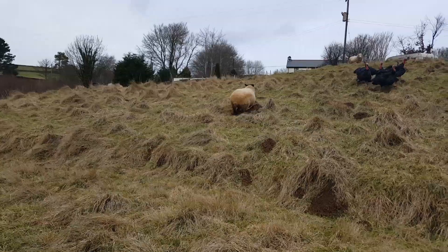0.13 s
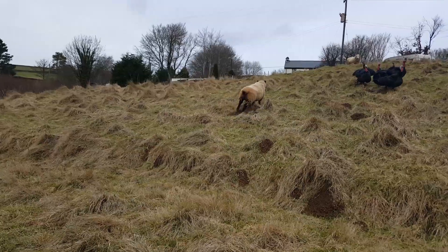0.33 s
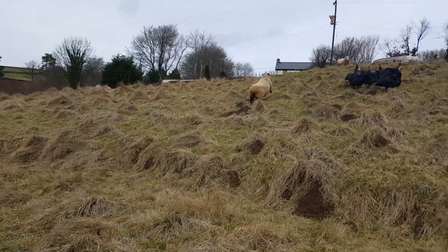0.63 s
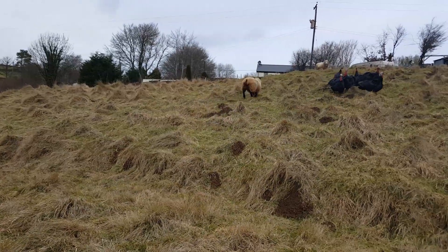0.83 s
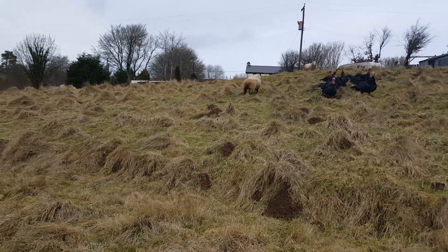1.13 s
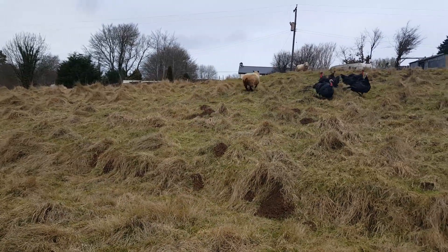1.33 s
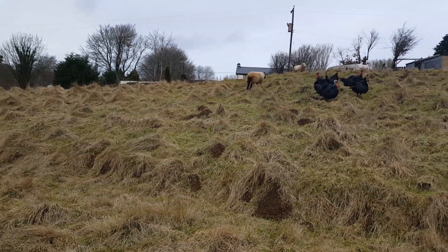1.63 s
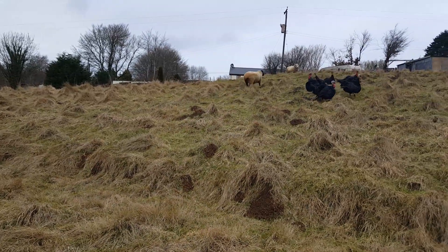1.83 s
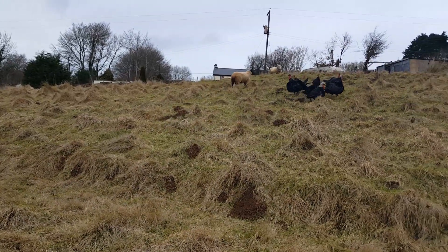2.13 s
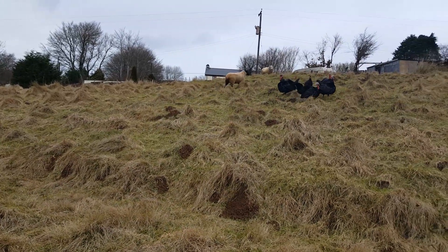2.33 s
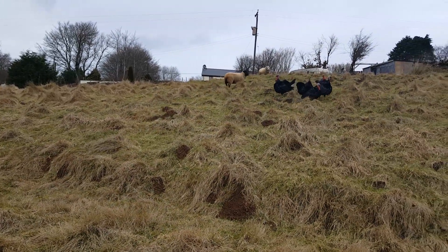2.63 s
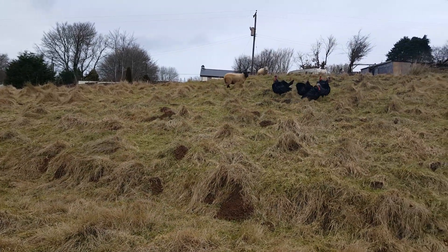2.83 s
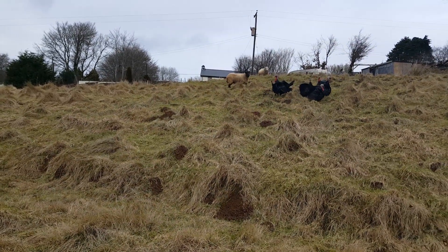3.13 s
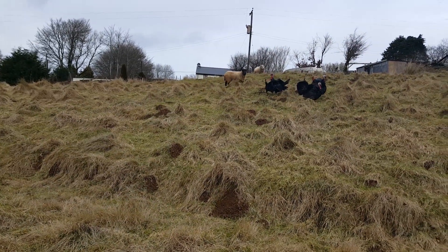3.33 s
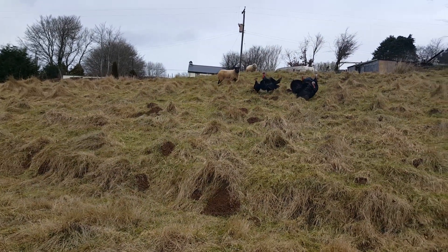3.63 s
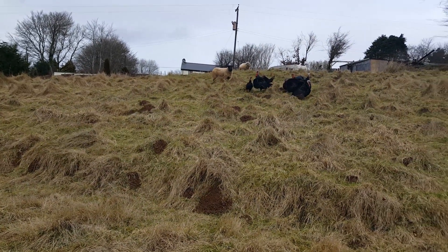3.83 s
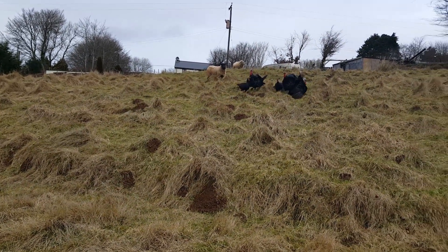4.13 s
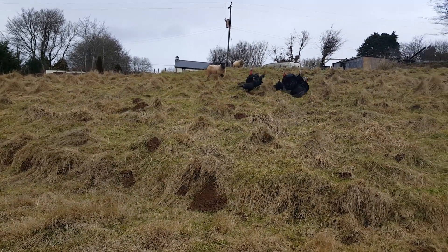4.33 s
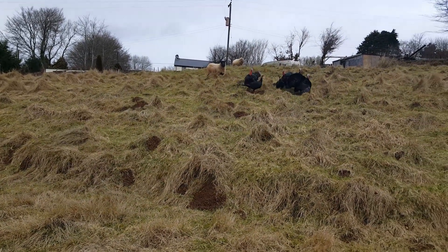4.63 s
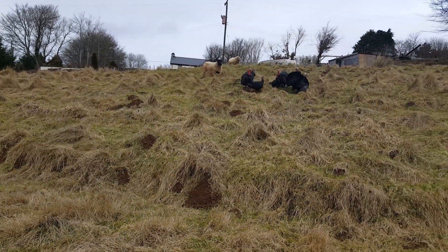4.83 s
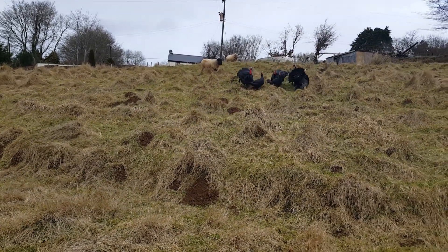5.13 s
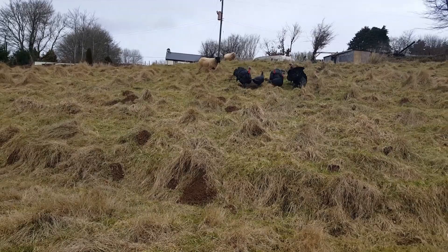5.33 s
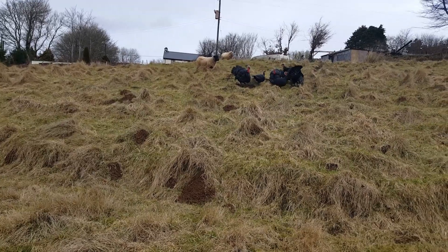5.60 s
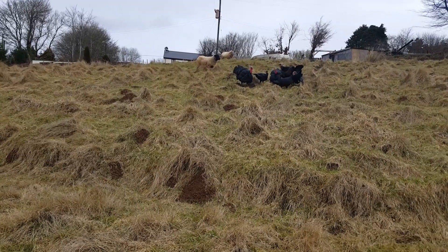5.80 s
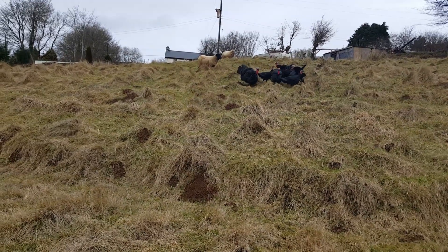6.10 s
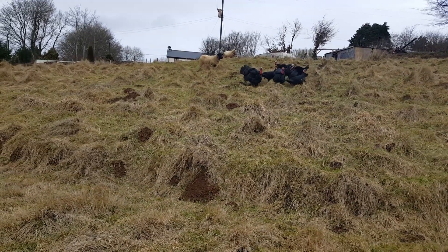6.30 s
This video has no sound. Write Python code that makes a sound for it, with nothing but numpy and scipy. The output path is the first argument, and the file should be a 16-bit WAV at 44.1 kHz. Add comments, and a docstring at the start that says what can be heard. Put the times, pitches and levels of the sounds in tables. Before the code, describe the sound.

Turkeys call outdoors on a grassy slope, with little echo: reedy, rapid, wavering bursts separated by pauses, the longest near four seconds and a last short one at the end. Soft breeze in dry grass and a faraway rumble lie underneath. Close to the microphone, a finger lifts off with a pop early on, then rubs the case in bright gritty strokes with clicks and low knocks.

```python
"""After a third of a second of near silence, sound fades in with a soft pop and scuff on the right as a finger
leaves that microphone port. Then turkeys gobble in five bursts on a grassy hillside: thin whines, loud yelps,
and syllables that slide up, break and fall back, all built from gliding, wavering harmonics.
Filtered noise makes the dry grass, a finger rubbing the camera's case and a low distant rumble.
Damped low tones make dull bumps; short bursts of noise make ticks on the case."""
import sys
import numpy as np
from scipy import signal
from scipy.fft import rfft, irfft, next_fast_len
from scipy.io import wavfile
from scipy.ndimage import uniform_filter1d, map_coordinates

SR = 44100
rng = np.random.default_rng(int(sys.argv[2]) if len(sys.argv) > 2 else 0)


def dump(signal):
    """Clip the signal to [-1, 1] and save it as 16-bit WAV at the path in sys.argv[1]."""
    limited = np.clip(np.atleast_2d(signal).T, -1, 1)
    pcm = np.round(limited * 32767).astype(np.int16)
    wavfile.write(sys.argv[1], SR, pcm)


N = 284886

# Bird levels below come before a small shared lift (in scene) and the hillside.
# Gobble syllables; overshoot, squeal and fall are left out at length 0, very short parts are stretched:
# start_s, slide_s, overshoot_s, squeal_s, fall_s, slide_level_db, rest_level_db
SYLLABLES = [(.762, 0.023, 0.0067, 0, 0, -48, -56), (.933, 0.046, 0.0034, 0.016, 0, -53, -54),
             (1.474, .045, 0, 0.0013, 0, -40, -42), (2.711, 0.041, 0, .031, 0.062, -41.5, -48),
             (2.879, .043, 0, 0.043, 0.043, -38.5, -46.5), (3.947, 0.04, 0.022, 0.01, .078, -40.5, -49.5),
             (4.129, .04, 0.0015, 0.037, 0.043, -39.5, -46.5), (4.285, .038, 0, 0.073, 0, -39.5, -51.5),
             (5.906, .034, 0, 0.036, .074, -44.5, -49.5), (6.096, .029, 0.031, 0.015, 0.052, -38.5, -49),
             (6.271, 0.029, 0.025, .045, 0.019, -43, -47)]
# How pitch and loudness move within each part of a syllable: share_of_length, pitch_hz, level_db
SLIDE = [(0, 640, -11.5), (.25, 670, -4), (.47, 713, 0.5), (.62, 920, -0.5), (.8, 1030, -2), (1, 1076, -13)]
OVERSHOOT = [(0, 1560, -4), (.35, 1550, 4), (.45, 1920, -4.5), (1, 1730, -4)]
SQUEAL = [(0, 1498, -5), (.45, 1402, -2), (1, 1340, -10.5)]
FALL = [(0, 1067, -9), (.25, 1041, 1.5), (.72, 938, 1.5), (.9, 790, 2), (1, 650, -13)]
# Strength of the slide's harmonics 2 to 5: level_db
SLIDE_OVERTONES = [-8.5, -10.5, -20, -27]
FALL_OCTAVE_DB, SQUEAL_OCTAVE_DB = -9, -14.5
# The short croak where a falling note bottoms out: share_of_length, pitch_hz, level_db
CROAK = [(0, 630, -9), (.4, 564, 3), (1, 510, -7.5)]
# Strength of the croak's harmonics 2 and 3: level_db
CROAK_OVERTONES = [1, 2.5]
CROAK_S, CROAK_DB = .02, -11  # length, level against the note
# A croak on its own: start_s, length_s, level_db
LONE_CROAK = (3.032, 0.046, -55)
# Held notes, some drooping at the end:
# start_s, length_s, droop_s, start_hz, end_hz, level_db, onset_db (against the level), octave_db
WHINES = [(0.582, 0.058, 0, 882, 890, -45.5, -4, -22), (.838, 0.052, 0.012, 975, 934, -46, 5, -10),
          (1.374, 0.1, 0.025, 1027, 920, -41, -14.5, -18), (2.495, .15, 0.02, 1000, 881, -49, -6, -14),
          (3.592, 0.1, 0, 865, 980, -49.5, -4.5, -30), (3.729, .156, 0.023, 925, 890, -50, 0, -13.5),
          (3.75, 0.038, 0, 890, 1067, -45, 2, -19), (4.322, .113, 0, 930, 944, -43, -7, -8.5),
          (5.698, .1, 0.024, 950, 805, -54.5, -5, -9)]
# Loud notes that dip and flick up:
# start_s, hold_s, sink_s, start_hz, dip_hz, end_hz, level_db, octave_db
YELPS = [(.695, 0.0072, 0.012, 954, 833, 1000, -46.5, -18), (1.009, .012, 0.018, 1002, 929, 1140, -34, -21),
         (1.542, 0.02, .025, 1046, 838, 1060, -34, -12.5),
         (1.625, 0.0061, 0.021, 1070, 831, 1070, -34.5, -11.5),
         (1.688, 0.0052, .014, 1054, 823, 1100, -35.5, -12.5),
         (3.843, .005, .013, 948, 720, 1150, -37.5, -18), (4.473, .029, 0.011, 1015, 858, 1010, -35.5, -9),
         (4.553, .005, .018, 1010, 813.5, 1076, -36, -9)]
# Small glides between and over the calls: start_s, length_s, start_hz, end_hz, level_db
CHIRPS = [(.815, 0.026, 655, 770, -46.5), (1.05, 0.0088, 1420, 1680, -39.5),
          (1.07, 0.018, 1390, 695, -44.5), (1.738, .013, 1010, 836, -53), (2.43, 0.031, 787, 1160, -52.5),
          (4.368, .04, 690, 820, -45), (4.579, 0.0078, 1780, 2030, -38)]
# Tone colour of the birds' throat and beak: pitch_hz, gain_db
THROAT = [(550, -5), (700, -2), (1050, -1.5), (1250, -2.5), (1420, 4), (1600, -3), (1900, 2), (2300, -9.5),
          (2750, 3.5), (3300, -35)]

# The noise colours below are shapes only; each is scaled to a common loudness before use.
# A finger rubbing the case, at each port: pitch_hz, level_db (per Hz)
RUB_LEFT = [(300, -12.5), (1500, -5.5), (3200, -7.5), (4500, -8.5), (6000, -12), (8500, -13), (10000, -9),
            (12500, -11.5), (15500, -16)]
RUB_RIGHT = [(300, -12.5), (1500, -4.5), (3200, -7.5), (4500, -1.5), (6000, 1), (7400, 2.5), (8500, -7.5),
             (10000, -18.5), (12500, -10), (15500, -19)]
# The finger's strokes: start_s, length_s, level_db, treble_db (added to the level for the bright part)
STROKES = [(1.423, .08, -50.5, -5.5), (2.861, 0.41, -48, 1), (3.283, 0.41, -48.5, 1),
           (3.704, 0.084, -43, .5), (3.808, 0.062, -41, -0.5), (3.881, 0.13, -46.5, 0.5),
           (4.044, .24, -47.5, -1), (4.294, 0.12, -43, -3), (4.436, .23, -44.5, 0),
           (4.68, .26, -52.5, -0.5), (4.915, .04, -49.5, 0.5), (4.96, .055, -56.5, -2)]
# Ticks on the case, before the rubbing colours: time_s, level_db, lean_right_db
TICKS = [(.482, -39, 16), (3.3985, -27.5, 6), (3.4258, -23, 5), (3.6135, -37, 1), (3.844, -34, 3),
         (3.8635, -35, 3), (3.9385, -30.5, 4), (4.0145, -33, 4), (4.1435, -37, 4), (4.954, -38, 0),
         (6.1045, -45, 14)]
# Dull bumps of feet and hands:
# time_s, level_db, pitch_hz, rise_hz_per_s, time_to_fall_60_db_s, attack_s, crunch_db (against the knock)
BUMPS = [(1.414, -26.5, 199, 0, 0.076, 0.0061, -23), (1.456, -31, 243, 0, .065, .001, -8),
         (1.458, -31, 378, 7000, .09, 0.0064, -8), (3.679, -34.5, 217, 0, .12, 0.0027, -30),
         (3.938, -38, 407, 0, .019, .0003, 4), (4.014, -37.5, 246, 0, 0.031, 0.00032, -4),
         (4.358, -26.5, 230, 0, 0.057, .001, -10), (4.373, -41, 425, 0, 0.14, 0.0023, 1),
         (6.21, -31.5, 218, 0, 0.036, .0003, -10.5)]
# Air and dry grass as each port hears them: pitch_hz, level_db (per Hz)
AIR_LEFT = [(200, -11), (900, 1.5), (2000, -0.5), (3200, -3), (4500, -8), (6000, -11), (8500, -12),
            (10000, -9.5), (12500, -11), (15500, -16.5)]
AIR_RIGHT = [(200, -3), (900, 1.5), (2000, -1.5), (3200, -1.5), (4500, -4.5), (6200, -5.5), (7300, -9.5),
             (8500, -18), (10000, -27), (12500, -21.5), (15500, -25)]
# Air moving in the grass: time_s, level_db
BREEZE = [(1.3, -50.5), (2.2, -54), (3.2, -53), (4.6, -50), (5.2, -55.5), (6.4, -52)]
# Grass swishes: middle_s, half_length_s, level_db (before the extra brightness)
SWISHES = [(0.583, 0.097, -53.5), (1.038, 0.11, -49.5), (1.444, 0.071, -47), (1.51, 0.026, -46.5),
           (4.34, 0.046, -50), (6.346, 0.052, -58)]
# The hand shading the right port's treble: time_s, gain_db
SHADE = [(.6, -3), (.75, -15), (1.05, -6.5), (1.5, -3), (1.85, -10), (2.3, 1), (6.4, -1)]
# The distant rumble: pitch_hz, level_db (per Hz)
RUMBLE = [(20, -31), (60, -17), (105, -6), (160, -4), (220, -0.5), (310, -8.5), (450, -17.5), (700, -19),
          (1100, -43), (2000, -68), (4000, -70)]

DROOP_HZ, DROOP_DB = 620, -7  # where a drooping whine ends
WHINE_WANDER = 0.0124  # slow unsteadiness, as a share of the pitch
WHINE_FADE_DB = -5  # at the end of a note that does not droop
FLICK_S, FLICK_DB, FLICK_END_DB = 0.0147, 2.5, -11  # closing rise: length, level as it sets off and stops
YELP_ATTACK_DB, YELP_HOLD_DB = -19, -5  # level at the start and after the hold
YELP_THIRD_DB = -21  # third harmonic against the octave
STROKE_ATTACK_S, STROKE_RELEASE_S = 0.026, 0.038
TREBLE_HZ = 5160  # where the bright part of the rubbing begins
SNAGS_PER_S, SNAG_DB, SNAG_SCATTER_DB = 130, -8, 2.3  # snags of the skin: rate, level in the grain, spread
LIFT_AT_S, LIFT_S, LIFT_RELEASE_S, LIFT_DB = .481, 0.051, 0.018, -34
HOLLOW_HZ, HOLLOW_HZ_PER_S = 620, 44000  # the port's hollow: first pitch, and its rise
WAKE_S, FADE_IN_S, MUTED_DB = 0.37, 0.26, -68  # fade start, its time constant, level before it
TOP_HZ = 16000


def amp(db):
    """Turn decibels into a gain."""
    return 10 ** (np.asarray(db) / 20)


def unit(x):
    """Scale to an average strength (rms) of 1."""
    return x / np.sqrt(np.mean(x ** 2) + 1e-20)


def along(points, hz):
    """Read a curve of (Hz, value) points on a log pitch axis."""
    f, v = np.transpose(points)
    return np.interp(np.log(hz + 1), np.log(f + 1), v)


def over_time(rows):
    """Turn (time, value) rows into one value per sample."""
    s, values = np.transpose(rows)
    return np.interp(np.arange(N) / SR, s, values)


def envelope(start, length, attack, release):
    """A straight attack, a hold and an exponential release; length includes the attack."""
    t = np.arange(N) / SR - start
    return np.clip(t / attack, 0, 1) * np.exp(-np.maximum(t - length, 0) / release)


def wobble(rate, size=N):
    """A smooth random curve through `rate` random points a second."""
    knots = rng.standard_normal(int(size * rate / SR) + 4)
    return map_coordinates(knots, [np.arange(size) * rate / SR])


def filtered(x, response):
    """Reshape x by a function of frequency."""
    m = next_fast_len(N + 8192)  # spare room keeps the end from wrapping onto the start
    return irfft(rfft(x, m) * response(np.fft.rfftfreq(m, 1 / SR)), m)[..., :N]


def coloured(x, *spectra):
    """Give each channel its own (Hz, dB) colour, then scale to rms 1."""
    return unit(filtered(x, lambda hz: amp([along(s, hz) for s in spectra])))


def noise():
    """Unrelated white noise for the two ports."""
    return rng.standard_normal((2, N))


def add(track, s, sound):
    """Mix a sound into a track at time s."""
    part = track[..., round(s * SR):][..., :sound.shape[-1]]
    part += sound[..., :part.shape[-1]]


def note(length, contour, overtones, jitter, flutter_db, wander=0):
    """One note of a bird's voice box: wavering harmonics that swell as they cross throat resonances."""
    longest = SR // 5
    u = np.linspace(0, 1, np.clip(round(length * SR), 256, longest))

    def waver(rate):
        return wobble(rate, longest)[:len(u)]

    share, pitch, level = np.transpose(contour)
    hz = uniform_filter1d(np.interp(u, share, pitch), size=180)
    hz = hz * (1 + jitter * waver(487) + 0.0094 * waver(96.7) + wander * waver(45.4))
    phase = 2 * np.pi * np.cumsum(hz) / SR
    tone = 0
    for k, db in enumerate([0, *overtones], 1):
        # higher harmonics flutter more
        strength_db = db + along(THROAT, k * hz) + flutter_db * np.sqrt(k) * waver(302.5)
        tone = tone + amp(strength_db) * np.sin(k * phase)
    soft_ends = signal.windows.tukey(len(u), 256 / len(u))
    return np.sqrt(2) * tone * amp(np.interp(u, share, level)) * soft_ends


def syllables():
    """A reedy slide breaks upward into a squeal; where the voice falls back, it ends in a croak."""
    out = np.zeros(N)
    for s, slide, overshoot, squeal, fall, slide_db, rest_db in SYLLABLES:
        add(out, s, amp(slide_db) * note(slide, SLIDE, SLIDE_OVERTONES, jitter=.04, flutter_db=2.3))
        s = s + slide
        parts = [(overshoot, OVERSHOOT, SQUEAL_OCTAVE_DB),
                 (squeal, SQUEAL, SQUEAL_OCTAVE_DB),
                 (fall, FALL, FALL_OCTAVE_DB)]
        for length, contour, octave_db in parts:
            if length > 0:
                add(out, s, amp(rest_db) * note(length, contour, [octave_db], jitter=.011, flutter_db=1))
                s = s + length
        if fall > 0:
            add(out, s, amp(rest_db + CROAK_DB) * croak(CROAK_S))
    s, length, db = LONE_CROAK
    add(out, s, amp(db) * croak(length))
    return out


def croak(length):
    """The slack, reedy bottom of the voice, made mostly of overtones."""
    return note(length, CROAK, CROAK_OVERTONES, jitter=.02, flutter_db=1.8)


def yelps():
    """Each yelp holds its pitch, sinks as it swells, and is loudest as it flicks up and stops."""
    out = np.zeros(N)
    for s, hold, sink, first_hz, dip_hz, last_hz, db, octave_db in YELPS:
        length = hold + sink + FLICK_S
        contour = [(0, first_hz, YELP_ATTACK_DB),
                   (hold / length, first_hz, YELP_HOLD_DB),
                   ((hold + .7 * sink) / length, dip_hz + (first_hz - dip_hz) / 8, -1.5),
                   ((hold + sink) / length, dip_hz, 0),
                   (1 - .6 * FLICK_S / length, dip_hz + (last_hz - dip_hz) / 4, FLICK_DB),
                   (1, last_hz, FLICK_END_DB)]
        overtones = [octave_db, octave_db + YELP_THIRD_DB]
        add(out, s, amp(db) * note(length, contour, overtones, jitter=.02, flutter_db=1.5))
    return out


def whines():
    """Thin held notes wander in pitch as their level shifts, then fade or droop into a croak."""
    out = np.zeros(N)
    for s, length, droop, first_hz, last_hz, db, onset_db, octave_db in WHINES:
        knee = length / (length + droop)  # share of the note before the droop
        contour = [(0, first_hz, onset_db - 6),
                   (knee / 6, first_hz + (last_hz - first_hz) / 6, onset_db / 2)]
        if droop > 0:
            contour += [(knee, last_hz, 0),
                        ((1 + knee) / 2, last_hz + (DROOP_HZ - last_hz) / 3, 0),
                        (1, DROOP_HZ, DROOP_DB)]
            # the croak slightly overlaps the end of the note
            add(out, s + length + droop - CROAK_S / 4, amp(db + CROAK_DB) * croak(CROAK_S))
        else:
            contour += [(.8, last_hz + (first_hz - last_hz) / 5, 0), (1, last_hz, WHINE_FADE_DB)]
        tone = note(length + droop, contour, [octave_db], jitter=.014, flutter_db=1.8, wander=WHINE_WANDER)
        add(out, s, amp(db) * tone)
    return out


def chirps():
    """Brief plain glides with a weak octave above."""
    out = np.zeros(N)
    for s, length, first_hz, last_hz, db in CHIRPS:
        middle_hz = 0.406 * first_hz + 0.59 * last_hz
        contour = [(0, first_hz, -10), (.45, middle_hz, 0.5), (1, last_hz, -3.5)]
        add(out, s, amp(db) * note(length, contour, [SQUEAL_OCTAVE_DB], jitter=0.021, flutter_db=2.0))
    return out


def hillside(x, wet_db, t60):
    """The sound reaches both ports, followed by faint, quickly dying scatter from the slope."""
    t = np.arange(SR // 2) / SR
    tail = rng.standard_normal((2, len(t))) * amp(-60 * t / t60)
    scatter = signal.fftconvolve(x[None], tail / np.linalg.norm(tail[0]), axes=1)[:, :N]
    # the case makes the left port lag: (Hz, radians)
    lag_points = [(600, 0.34), (1000, 0.49), (1500, 0.71), (2100, 1.65), (3000, 0.046)]
    sides = np.array([[-1], [1]])
    direct = filtered(x, lambda hz: np.exp(.5j * along(lag_points, hz) * sides))
    return direct * amp([[.9], [0]]) + amp(wet_db) * scatter


def rubbing():
    """Skin slips on the case in strokes of fine grains and tiny snags, joined by thin noise ticks."""
    speeds = [amp(db) * envelope(s, length, STROKE_ATTACK_S, STROKE_RELEASE_S)
              for s, length, db, _ in STROKES]
    body = np.max(speeds, axis=0)
    bright = np.max([amp(stroke[3]) * speed for stroke, speed in zip(STROKES, speeds)], axis=0)
    snags = (rng.random(N) < SNAGS_PER_S / SR) * amp(SNAG_SCATTER_DB * rng.standard_normal(N))
    snags = unit(np.convolve(snags, signal.windows.hann(SR // 400), "same"))
    roughness = amp(0.95 * wobble(1200) + 0.61 * wobble(70)) + amp(SNAG_DB) * snags
    grains = coloured(noise() * roughness, RUB_LEFT, RUB_RIGHT)
    treble = filtered(grains, lambda hz: 1 - 1 / (1 + (hz / TREBLE_HZ) ** 4))
    strokes = body * (grains - treble) + bright * treble

    tick_levels, t = np.zeros((2, N)), np.arange(SR // 50) / SR
    snap = amp(-60 * t / .005) + amp(-20 - 60 * t / .02)  # a quick decay and a weaker, slower one
    for s, db, right_db in TICKS:
        add(tick_levels, s, amp(db) * snap * amp([[-right_db / 2], [right_db / 2]]))
    ticks = tick_levels * coloured(noise(), RUB_LEFT, RUB_RIGHT)
    return strokes + filtered(ticks, lambda hz: hz / np.hypot(hz, 4000))  # ticks lose their bass


def uncovering():
    """A soft pop and a chirping scuff: the right port's hollow rises in pitch as the finger opens it."""
    t = np.clip(np.arange(N) / SR - LIFT_AT_S, 0, 2 * LIFT_S)
    hz = HOLLOW_HZ + HOLLOW_HZ_PER_S * t
    carrier = np.exp(2j * np.pi * np.cumsum(hz) / SR)
    hollow = unit(np.real((wobble(800) + 1j * wobble(800)) * carrier))  # a noise band around hz
    scuff = coloured(noise()[0], [(150, -1), (3500, 2), (5500, -2.5), (8000, -23), (15000, -28)])[0]
    pop = amp(12.5 - 60 * t / 0.019) * np.sin(2 * np.pi * 220 * t)
    opening = envelope(LIFT_AT_S, LIFT_S, attack=0.00042, release=LIFT_RELEASE_S)
    mono = amp(LIFT_DB) * opening * (pop + amp(-1) * hollow + amp(-2.5) * scuff)
    return mono * amp([[-26], [0]])


def bumps():
    """Each bump is a damped low knock, soft or sudden, with a short crunch of noise."""
    out, t = np.zeros((2, N)), np.arange(SR // 5) / SR
    crunch_colour = [(80, -19), (300, 5.5), (750, 2.5), (1300, -7), (3500, -6.5), (9000, -35)]
    crunch = coloured(noise()[0], crunch_colour)[0]
    for s, db, hz, rise, t60, attack, crunch_db in BUMPS:
        knock = np.sin(2 * np.pi * (hz + rise * t / 2) * t)
        knock = knock + amp(crunch_db) * crunch[round(s * SR):][:len(t)]
        add(out, s, amp(db - 60 * t / t60) * (1 - np.exp(-t / attack)) * knock)
    return out


def grass():
    """Moving air is a soft hiss; dry stalks add brighter, crackly swishes of uneven noise."""
    t = np.arange(N) / SR
    swish = sum(amp(db) * np.exp(-((t - s) / half) ** 2) for s, half, db in SWISHES)
    stalks = coloured(noise() * amp(2.1 * wobble(900)), AIR_LEFT, AIR_RIGHT)
    stalks = filtered(stalks, lambda hz: amp(along([(2000, 0.5), (10000, 4.2)], hz)))
    air = amp(over_time(BREEZE) + 1.1 * wobble(3.97)) * coloured(noise(), AIR_LEFT, AIR_RIGHT)
    left, right = air + swish * stalks
    # the hand changes only this part of the right port's sound
    treble = filtered(right, lambda hz: along([(2500, 0.39), (5500, 1), (9000, 1), (11000, 0.25)], hz))
    return np.array([left, right + (amp(over_time(SHADE)) - 1) * treble])


def rumble():
    """Far, low, restless noise, nearly alike at both ports."""
    mid, side = coloured(noise(), RUMBLE)
    side = side * amp(-12)
    level = amp(-50.5 + 0.64 * wobble(3.06) + 1.55 * wobble(15))
    return level * np.array([mid + side, mid - side])


def scene():
    """The birds on the slope, the handling of the camera and the open air."""
    turkeys = amp(1.1) * (syllables() + yelps() + whines() + chirps())
    birds = hillside(turkeys, wet_db=-16.5, t60=0.19)
    handling = rubbing() + uncovering() + bumps()
    return birds + handling + grass() + rumble()


def record(dry):
    """The camera fades in and keeps nothing above its band limit."""
    awake = np.maximum(np.arange(N) / SR - WAKE_S, 0)
    fade_in = amp(MUTED_DB) + 1 - np.exp(-awake / FADE_IN_S)
    return filtered(dry * fade_in, lambda hz: hz < TOP_HZ)


dry = scene()
out = record(dry)
dump(out)
```